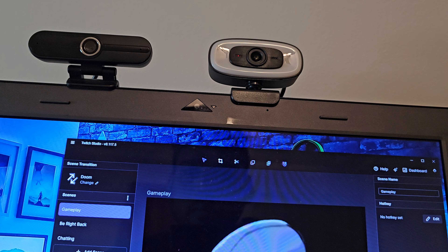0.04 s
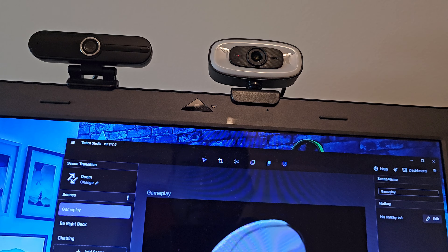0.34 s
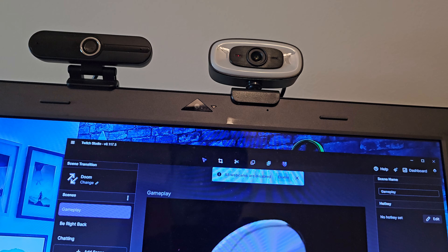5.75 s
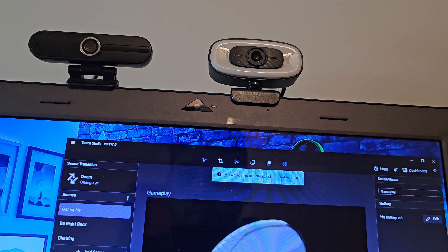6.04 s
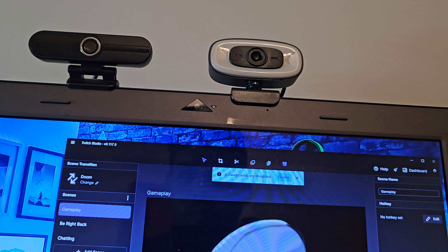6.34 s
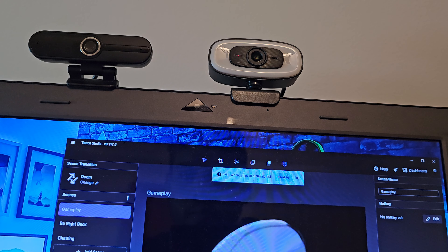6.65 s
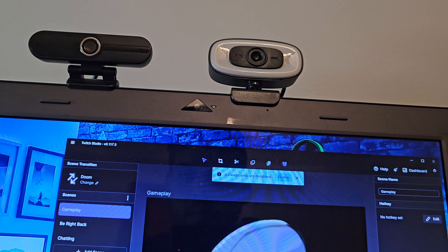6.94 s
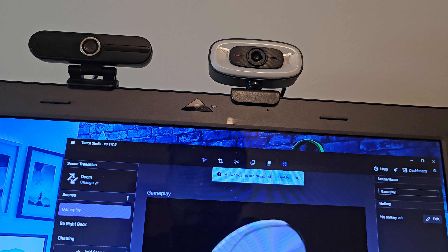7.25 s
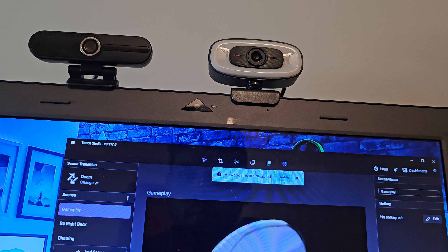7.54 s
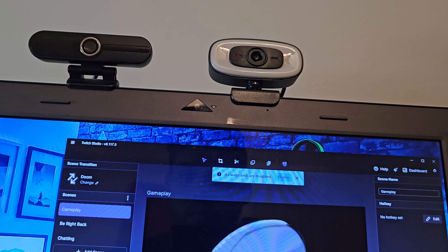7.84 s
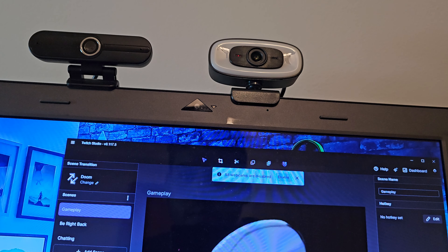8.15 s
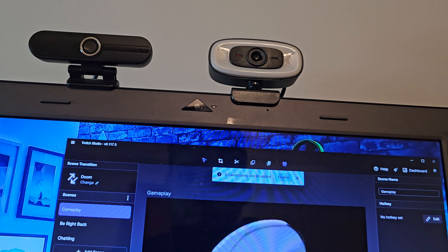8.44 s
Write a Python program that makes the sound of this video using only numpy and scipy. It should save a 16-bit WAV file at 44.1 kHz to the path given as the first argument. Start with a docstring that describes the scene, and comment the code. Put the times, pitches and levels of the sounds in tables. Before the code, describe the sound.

In a small, quiet room, a low rumble, a steady hum and the soft rush of a laptop fan run throughout, with a faint whine that creeps upward. Near the microphone, a key is tapped twice, dully, the second tap touched by a soft hiss. Crisp plastic mouse clicks follow: five quick pairs separated by pauses, then a lone click near the end, each with a short echo.

```python
"""A computer mouse is clicked at a laptop in a small, quiet room: sharp presses and releases.
Each time, the switch spring snaps over and rings the plastic shell, the button rebounds and the
room echoes. First come two duller taps, as of a key hitting bottom; a brief soft hiss swells just
before the second tap and another around it. All along, the room rumbles and a fan slowly speeds up
over mains hum, with a rush of air, a rising whine and a thin, flickering hiss."""
import sys
import numpy as np
from scipy import signal
from scipy.fft import rfft, irfft, next_fast_len
from scipy.io import wavfile
from scipy.ndimage import uniform_filter1d, map_coordinates

SR = 44100
rng = np.random.default_rng(int(sys.argv[2]) if len(sys.argv) > 2 else 0)


def unload_wav(signal):
    """Save mono or channel-first audio to the path in sys.argv[1] as 16-bit WAV at rate SR, clipped to [-1, 1]."""
    wavfile.write(
        sys.argv[1],
        SR,
        np.round(np.clip(np.atleast_2d(signal).T, -1, 1) * 32767).astype(np.int16),
    )


N = 378819

# In all tables, "balance" is how much louder the left is than the right,
# "phase gap" is how far the left wave runs ahead, and "fade" is the time to die away by 60 dB.
# the rumble's mix of low pitches: (frequency [Hz], relative level [dB])
RUMBLE_COLOUR = [(18, -22), (30, -19), (35, -18.5), (40, 5), (47, -1.5), (52, 0.5), (62, -18.5), (75, -29),
                 (110, -61), (200, -120)]
# the rumble's slow swells: (time [s], level [dB])
RUMBLE_SWELLS = [(0.0, -48.5), (0.6, -35.5), (0.8, -43.5), (1.2, -39.5), (1.4, -46), (1.8, -36),
                 (2.0, -42.5), (3.2, -41), (4.39, -44.5), (5.191, -40.0), (5.79, -44.5), (6.59, -39.5),
                 (6.991, -46.5), (7.39, -38.5), (7.79, -44.5), (8.59, -38)]
# the fan speeding up: (time [s], speed [turns/s])
FAN_SPEED = [(0, 49.85), (4.3, 51.0), (8.59, 51.9)]
# the fan's whine: (multiple of the speed, level [dB], growth [dB per extra turn/s], phase gap [rad])
FAN_WHINE = [(13, -78, 4.5, 1.4), (16, -82.5, 3, 0.22), (17, -81.5, 3, 1.1), (20, -81.5, .5, 1.6),
             (21, -89.5, -4.5, 2.7), (24, -86, 1, 2), (26, -88.5, 3, 1.8)]
# mains hum and other steady tones: (frequency [Hz], level [dB], phase gap [rad])
HUMS = [(58.9, -53, 0.16), (120.6, -62.5, 0.28), (183.4, -81, 1.1), (247, -82.5, 0.58),
        (616.8, -75.5, 1.69), (759.5, -78, 1.5), (808.5, -75, 1.2), (947, -83, 0.99), (1229, -85.5, 1.4)]
# the rush of air before resonances lift it: (frequency [Hz], level [dB per Hz])
AIR_COLOUR = [(20, -87), (80, -79), (130, -83), (200, -89.5), (300, -95), (380, -100), (780, -99),
              (1100, -105), (1400, -109), (2500, -118), (4000, -124), (9500, -139), (12500, -132),
              (16000, -131)]
# resonances of the room and the fan's duct: (frequency [Hz], width [Hz], lift [dB])
AIR_RESONANCES = [(111.5, 12, 10), (130, 7.1, 0), (167.3, 7, 10.5), (224, 10, 4), (272.2, 10.9, 12),
                  (475, 16, 9.5), (1761, 280, 7), (3140, 160, 8), (4830, 640, 7.5), (7510, 180, 7.5)]
# how alike the rush is on both sides: (frequency [Hz], likeness [0 to 1])
AIR_LIKENESS = [(70, 0.71), (105, 0.8), (160, 0.9), (500, 0.68), (750, 0.79), (1100, 0), (16000, 0)]
# which side the rush leans to: (frequency [Hz], balance [dB])
AIR_BALANCE = [(110, -0.5), (200, 3), (380, 0.5), (800, 10.5), (1100, -1), (1400, 2.5), (2100, 18),
               (3000, 5), (4400, 10), (6500, 12.5), (9000, -3), (15000, 5)]
# the fan's thin hiss: (frequency [Hz], width [Hz], level [dB])
HISS_BANDS = [(4300, 120, -99), (4570, 110, -95), (4930, 130, -99)]
# the room's echo: (frequency [Hz], fade [s], strength of the walls' answer [dB])
ROOM_ECHO = [(198, 0.17, -3), (1000, 0.23, 1.5), (3980, 0.21, 5), (5400, 0.26, -3), (6250, 0.24, -3),
             (7600, 0.2, 1.5), (9970, 0.18, -3), (15000, 0.17, -3.5)]
# dull key taps: (time [s], level [dB], case boost [dB], case pitch [ratio], thump pitch [Hz],
# thump level [dB], finger's head start [s], finger's level [dB])
KEY_TAPS = [(0.2141, -5, -2, 0.96, 252, -41, 0.0048, -44), (0.81, 0, 1, 0.98, 129.6, -33, 0.002, -51)]
# ringing tones of the key and its case: (frequency [Hz], fade [s], rise [s], level [dB], balance [dB])
KEY_AND_CASE_TONES = [(500, 0.0083, 0.0017, -55, -6), (737, 0.029, 0.0043, -37.5, -3),
                      (955, 0.027, 0.0037, -45.5, -4), (1062, 0.022, 0.0019, -30.5, -1.5),
                      (1226, 0.03, 0.0012, -41, 2.5), (1485, 0.05, 0.0017, -51, 6),
                      (1776, 0.017, 0.0029, -39, 10.5), (2050, 0.041, 0.0034, -49, -8),
                      (2330, 0.019, 0.00096, -55.5, -2), (2780, 0.02, 0.00061, -49, 0),
                      (4100, 0.0098, 0.00028, -43, 6.5), (4800, 0.0071, 0.00023, -38.5, -5.5),
                      (5330, 0.013, 0.0002, -42.5, 2), (5750, 0.021, 0.00038, -50, 9),
                      (5990, 0.012, 0.0005, -30, 4.5), (6330, 0.011, 0.00036, -40, 0),
                      (11700, 0.0099, 0.0005, -55, -9.5)]
# what a tap throws in all directions: (frequency [Hz], balance [dB], level [dB])
TAP_SCATTER = [(2000, 0, -33), (3500, 0, -26.5), (5000, 1, -10.5), (6000, 7, -15), (7050, 2, -24),
               (8500, 0, -48), (10500, -8, -57), (11800, -10, -40.5), (15600, -7, -39), (16400, -5, -55.5)]
# brief soft hisses, before and around the second tap: (time [s], length [s], level [dB])
SOFT_HISSES = [(0.7, 0.087, -79), (0.81, 0.016, -61)]
# mouse clicks: (time [s], level [dB], balance [dB], stroke [0 to 3], boost of the spring's ping [dB])
MOUSE_CLICKS = [(1.4967, 1.5, 0, 0, 0), (1.6313, .3, -.5, 2, 3), (2.2652, 2, .5, 1, 0),
                (2.4011, 1, .5, 3, 0), (3.6616, 1.2, .5, 1, 0), (3.7872, .3, .5, 3, 1),
                (5.0091, .8, -.5, 1, 1), (5.1317, 1.4, -1, 3, 1), (6.8320, .8, .2, 0, 0),
                (6.9718, 2.2, 1, 2, -3), (8.4423, 1.5, .2, 0, 0)]
# the four strokes: 0 light press, 1 firm press, 2 light release, 3 firm release
# (rebound delay [s], rebound level [dB], knock level [dB], snap level [dB], direction [0 down, 1 up])
BUTTON_STROKES = [(.0025, -12, -51, -39.5, 0), (.0013, -11, -52, -40, 0), (.0021, -12, -47, -40.5, 1),
                  (.0019, -13, -47, -40, 1)]
# ringing tones of the mouse shell:
# (frequency [Hz], balance [dB], phase gap [rad], then a level [dB] for each of the four strokes)
SHELL_TONES = [(3050, 4, 2.6, -52, -53, -47, -46), (3380, -1, 1.4, -58, -48.5, -56, -42.5),
               (3850, 3, 1.9, -40.5, -47, -43, -52), (4250, 9, 2.1, -42, -56, -54, -60),
               (4620, 6, 2.4, -43, -54, -41, -53), (5080, 7, -2.2, -40, -39, -37.5, -38.5),
               (5400, 6, -1.9, -40.5, -36.5, -43, -49), (5750, 3, -3.1, -41, -39, -47, -53),
               (6080, 3, 2.9, -41.5, -33, -45, -44.5), (6880, 4, 2.4, -47, -44, -40, -38.5),
               (7280, -6, 2.7, -48, -37, -38, -33), (8200, -6, 0.2, -45, -46.5, -45, -47),
               (9250, -13, 0.4, -45, -36, -50, -45), (9850, -17, 0.7, -56, -37.5, -55, -54),
               (10300, -18, 0.8, -64, -54, -62, -43.5), (11150, -16, 0.8, -58, -62, -61, -53),
               (11900, -16, 2.2, -50.5, -50, -60, -59), (12400, -15, 2.3, -51.5, -49.5, -58, -49),
               (13300, -15, 2.4, -57, -51, -59, -39.5), (14200, -15, -1.2, -52, -59, -47, -51),
               (14620, -15, -2.0, -55, -59, -46.5, -42.5), (15500, -4, -1.1, -53, -45, -50, -46)]
# what a click throws in all directions:
# (frequency [Hz], balance [dB], press level [dB], release level [dB])
CLICK_SCATTER = [(2400, 4, -47, -45), (3300, 4, -33, -29), (4000, 5, -27.5, -32), (4600, 6, -31, -32),
                 (5300, 7, -15, -18.5), (6000, 4, -22, -23.5), (6500, 1, -29, -26),
                 (7050, -1, -24.5, -16.5), (7700, -3, -33, -28), (8400, -4, -39, -38),
                 (9400, -9, -29.5, -37), (10500, -13, -50, -40), (12200, -14, -35.5, -37),
                 (13600, -14, -36, -31), (14600, -13, -36, -32), (15600, -5, -33, -32),
                 (16500, -5, -50, -50)]


def amp(db):
    """Turn decibels into a gain to multiply by."""
    return 10 ** (np.asarray(db) / 20)


def unit(x):
    """Scale a sound to an average power of 1."""
    return x / np.sqrt(np.mean(x ** 2) + 1e-20)


def along(points, hz):
    """Read between (frequency, value) points, spaced as pitch is heard."""
    point_hz, values = np.transpose(points)
    return np.interp(np.log(hz + 1), np.log(point_hz + 1), values)


def sides(balance_db):
    """Left and right gains for a balance."""
    return amp(np.array([[.5], [-.5]]) * balance_db)


def wobble(per_s):
    """A smooth curve through per_s random values a second."""
    return map_coordinates(rng.standard_normal(int(N * per_s / SR) + 4), [np.arange(N) * per_s / SR])


def filtered(x, response):
    """Scale each frequency of a sound by response(hz)."""
    size = next_fast_len(N + SR // 2)
    return irfft(rfft(x, size) * response(np.fft.rfftfreq(size, 1 / SR)), size)[..., :N]


def add(track, time, sound):
    """Mix a stereo sound in at a time in seconds."""
    part = track[:, round(time * SR):][:, :sound.shape[1]]
    part += sound[:, :part.shape[1]]


def decay(t, fade_s):
    """A gain that falls by 60 dB every fade_s seconds."""
    return np.exp(-np.log(1000) * t / fade_s)


def rumble():
    """The room's lowest resonances drone, swell slowly and beat at random."""
    drone = unit(filtered(rng.standard_normal(N), lambda hz: amp(along(RUMBLE_COLOUR, hz))))
    slow_power = np.abs(uniform_filter1d(drone ** 2, size=round(0.78 * SR)))
    even = unit(drone / np.sqrt(slow_power + 0.064))  # only the quicker beats remain
    swell = amp(np.interp(np.arange(N) / SR, *np.transpose(RUMBLE_SWELLS)))
    return sides(1.0) * swell * even


def tone(cycles, db, phase_gap):
    """A thin, slightly unsteady tone, out of step between left and right."""
    angle = 2 * np.pi * cycles + 0.37 * wobble(2.046) + np.array([[.5], [-.5]]) * phase_gap
    return amp(db + 1.4 * wobble(2)) * np.sqrt(2) * np.sin(angle)


def fan_whine():
    """The fan's tones climb as it spins faster, and most grow louder."""
    speed = np.interp(np.arange(N) / SR, *np.transpose(FAN_SPEED))
    turns = np.cumsum(speed) / SR
    extra_speed = speed - speed.mean()
    return sum(tone(multiple * turns, db + growth * extra_speed, gap)
               for multiple, db, growth, gap in FAN_WHINE)


def fan_rush():
    """Moving air, louder at the resonances; left and right share the bass but not the treble."""
    def colour(hz):
        lift_db = sum(db / (1 + ((hz - centre) / width) ** 2) for centre, width, db in AIR_RESONANCES)
        spread = np.arccos(along(AIR_LIKENESS, hz)) / 2
        return amp(along(AIR_COLOUR, hz) + lift_db) * np.array([np.cos(spread), np.sin(spread)])
    shared, opposed = filtered(rng.standard_normal((2, N)) * np.sqrt(SR / 2), colour)
    stereo = np.array([shared + opposed, shared - opposed])
    return filtered(stereo, lambda hz: sides(along(AIR_BALANCE, hz)))


def hum():
    """Mains hum and faint higher tones hold their pitch."""
    t = np.arange(N) / SR
    return sum(tone(hz * t, db, gap) for hz, db, gap in HUMS)


def fan_hiss():
    """Narrow bands of hiss flicker, each on its own, mostly on the left."""
    out = np.zeros((2, N))
    for centre, width, db in HISS_BANDS:
        band = filtered(rng.standard_normal((2, N)), lambda hz: 1 / (1 + ((hz - centre) / width) ** 2))
        flicker = amp(2.9 * wobble(per_s=16))
        out += amp(db) * unit(band * flicker)
    return sides(12) * out


def ring(hz, fade_s, rise_s, db, balance_db, phase, gap):
    """A struck part rings with several tones that rise quickly and die away."""
    t = np.arange(SR // 10)[:, None] / SR
    envelope = decay(t, fade_s) * (1 - np.exp(-t / rise_s))
    waves = np.array([np.sin(2 * np.pi * hz * t + phase + shift) for shift in (gap / 2, -gap / 2)])
    return np.sum((sides(balance_db) * amp(db))[:, None] * waves * envelope, axis=2)


def crack(low_hz, high_hz, fade_s, rise_s):
    """The short burst of noise when two parts meet."""
    t = np.arange(SR // 10) / SR
    band = signal.butter(4, [low_hz, high_hz], "band", fs=SR, output="sos")
    burst = rng.standard_normal((2, len(t))) * decay(t, fade_s) * (1 - np.exp(-t / rise_s))
    return signal.sosfilt(band, burst)


def echoes(near_db, delay_s, fade_s, tail_db):
    """The room's answer to a snap: quick echoes off the near walls, then a smooth tail."""
    room_hz, room_fade_s, _ = np.transpose(ROOM_ECHO)
    hz, times, spectrum = signal.stft(rng.standard_normal((2, SR // 2)), SR, nperseg=256)
    tail_fade_s = along(np.c_[room_hz, room_fade_s], hz)[:, None]
    _, tail = signal.istft(spectrum * decay(times, tail_fade_s), SR, nperseg=256)
    t = np.arange(tail.shape[1]) / SR
    tail *= 1 - np.exp(-t / 0.0076)  # the tail takes a moment to build
    near = rng.standard_normal(tail.shape) * (t > delay_s) * decay(t, fade_s)
    return amp(tail_db) * tail / np.linalg.norm(tail[0]) + amp(near_db) * near / np.linalg.norm(near[0])


def in_room(sound, echo):
    """A sound followed by its echoes, coloured by the walls."""
    room_hz, _, wall_db = np.transpose(ROOM_ECHO)
    size = echo.shape[1]
    walls = amp(along(np.c_[room_hz, wall_db], np.fft.rfftfreq(size, 1 / SR)))
    direct = np.arange(size) == 0
    return signal.fftconvolve(sound, direct + irfft(rfft(echo) * walls, size), axes=1)


def scatter(band_hz, balance_db, db, echo):
    """Sound thrown in all directions comes back with its tones blurred into a short hiss."""
    size = echo.shape[1]
    hz = np.fft.rfftfreq(size, 1 / SR)
    colour = amp(along(np.c_[band_hz, db], hz)) * sides(along(np.c_[band_hz, balance_db], hz))
    return irfft(rfft(echo) * colour, size)[:, :size // 2]


def key_taps():
    """The finger touches, the key hits bottom with a click and a thump, then the case booms."""
    out = np.zeros((2, N))
    hz, fade_s, rise_s, tone_db, balance_db = np.transpose(KEY_AND_CASE_TONES)
    low, high = hz < 3000, hz >= 3000  # the case rings low, the key high
    boom_delay_s = 0.00201
    for time, db, case_db, pitch, thump_hz, thump_db, ahead_s, touch_db in KEY_TAPS:
        phase = rng.uniform(0, 2 * np.pi, len(hz))
        tones = np.array([fade_s, rise_s, tone_db, balance_db, phase])
        case = ring(hz[low] * pitch, *tones[:, low], gap=1.74)
        key = ring(hz[high], *tones[:, high], gap=1.74)
        snap = amp(-38) * crack(4420, 6560, fade_s=0.016, rise_s=0.0004)
        rattle = amp(-36.5) * crack(750, 2300, fade_s=0.075, rise_s=0.0015)
        tick = amp(-49.5) * sides(-10) * crack(11900, 16200, fade_s=0.0088, rise_s=0.00056)
        thump = ring(thump_hz * np.array([1, 2.12]), fade_s=0.053, rise_s=0.0031,
                     db=[thump_db, thump_db - 8], balance_db=1.0, phase=0, gap=0)
        key_echo = echoes(near_db=-11, delay_s=0.0055, fade_s=0.1, tail_db=-16.5)
        scatter_echo = echoes(near_db=-7.5, delay_s=0.0074, fade_s=0.11, tail_db=-9)
        case_echo = echoes(near_db=-8, delay_s=0.0081, fade_s=0.069, tail_db=-13.5)
        add(out, time - ahead_s, amp(touch_db) * crack(900, 5500, fade_s=0.03, rise_s=0.00029))
        add(out, time, thump)
        add(out, time, amp(db) * in_room(key + snap + tick, key_echo))
        add(out, time, amp(db) * scatter(*np.transpose(TAP_SCATTER), scatter_echo))
        add(out, time + boom_delay_s, amp(db + case_db) * in_room(case + rattle, case_echo))
    return out


def soft_hisses():
    """A brief soft hiss swells and fades just before the second tap, and another around it."""
    out = np.zeros((2, N))
    band = signal.butter(4, [1500, 6600], "band", fs=SR, output="sos")
    for time, length, db in SOFT_HISSES:
        swell = np.exp(-(2 * (np.arange(N) / SR - time) / length) ** 2)
        out += amp(db) * swell * unit(signal.sosfilt(band, rng.standard_normal((2, N))))
    return out


def mouse_clicks():
    """The switch spring snaps over and rings the shell; the button rebounds and rattles on its stop."""
    out = np.zeros((2, N))
    hz, balance_db, gap, *stroke_db = np.transpose(SHELL_TONES)
    scatter_hz, scatter_balance, *scatter_db = np.transpose(CLICK_SCATTER)
    fade_s = np.interp(hz, [5000, 11000], [.012, .0095])  # plastic stops high tones sooner
    ping = np.exp(-((hz - 7200) / 550) ** 2)  # the spring pings near 7200 Hz
    usual_phase = rng.uniform(0, 2 * np.pi, (len(stroke_db), len(hz)))  # like strokes sound alike
    shell_rise_s, rebound_rise_s = 0.0017, 0.0012
    left_delay_s = 0.00036  # the left side is farther from the mouse
    for time, db, side_db, stroke, ping_db in MOUSE_CLICKS:
        rebound_s, rebound_db, knock_db, snap_db, direction = BUTTON_STROKES[stroke]
        phase = usual_phase[stroke] + 0.5 * rng.standard_normal(len(hz))
        held_hz = hz * (1 + 0.005 * rng.standard_normal(len(hz)))  # the hand detunes the shell a little
        tone_db = stroke_db[stroke] + ping_db * ping
        shell = ring(held_hz, fade_s, shell_rise_s, tone_db, balance_db, phase, gap)
        new_phase = rng.uniform(0, 2 * np.pi, len(hz))
        rebound = ring(held_hz, fade_s, rebound_rise_s, tone_db + rebound_db, balance_db, new_phase, gap)
        add(shell, rebound_s * rng.uniform(0.97, 1.15), rebound)
        snap = amp(snap_db) * sides(-12) * crack(10800, 16400, fade_s=0.007, rise_s=0.0014)
        rattle = amp(-47.5) * sides(3.8) * crack(3200, 7600, fade_s=0.022, rise_s=0.001)
        knock = amp(knock_db) * crack(1300, 2300, fade_s=0.026, rise_s=0.001)
        left, right = amp(db) * sides(side_db) * (shell + snap + rattle + knock)
        click = np.array([np.roll(left, round(left_delay_s * SR)), right])
        click_echo = echoes(near_db=-16, delay_s=0.0072, fade_s=0.052, tail_db=-14)
        scatter_echo = echoes(near_db=-14, delay_s=0.0052, fade_s=0.067, tail_db=-8.5)
        add(out, time, in_room(click, click_echo))
        add(out, time, amp(db) * scatter(scatter_hz, scatter_balance, scatter_db[direction], scatter_echo))
    return out


def scene():
    """Clicks, taps and soft hisses over the room's constant background."""
    events = mouse_clicks() + key_taps() + soft_hisses()
    return events + rumble() + fan_whine() + fan_rush() + hum() + fan_hiss()


def record(dry):
    """Cut away the very highest treble."""
    return filtered(dry, lambda hz: hz < 16100)


dry = scene()
out = record(dry)
unload_wav(out)
```